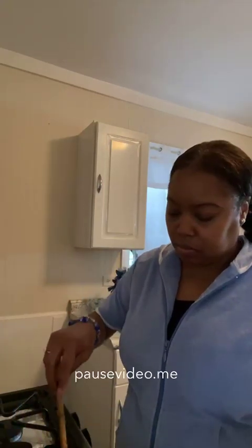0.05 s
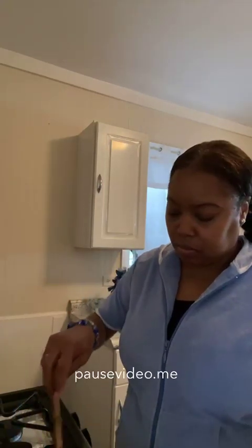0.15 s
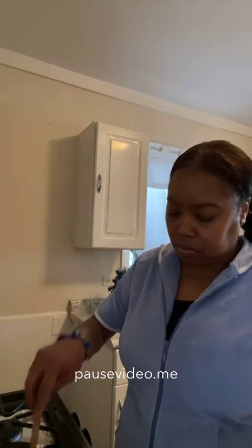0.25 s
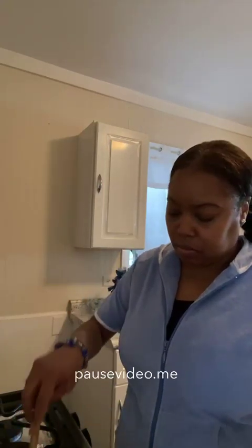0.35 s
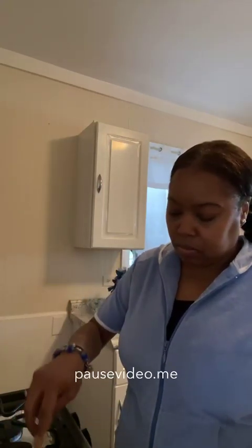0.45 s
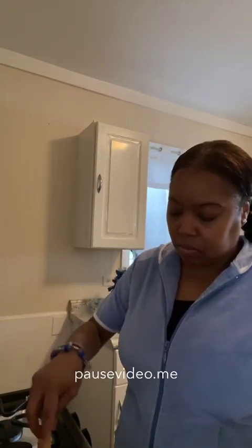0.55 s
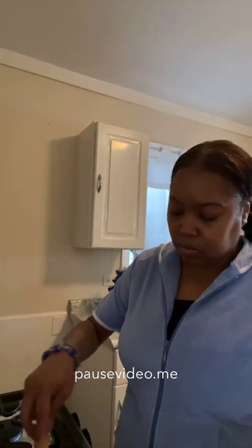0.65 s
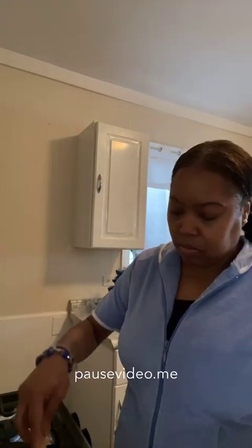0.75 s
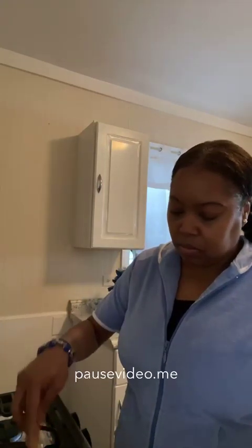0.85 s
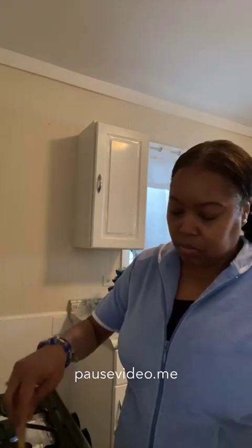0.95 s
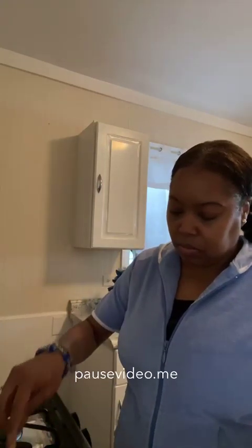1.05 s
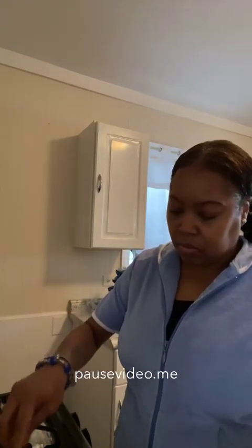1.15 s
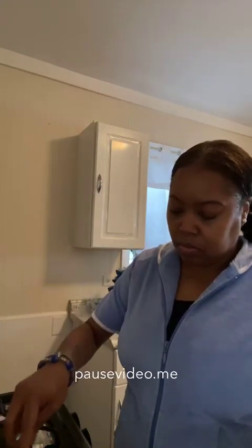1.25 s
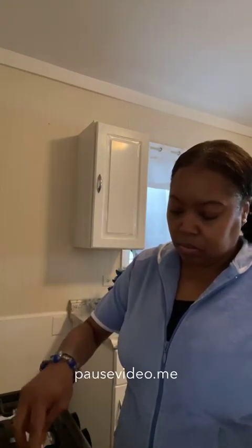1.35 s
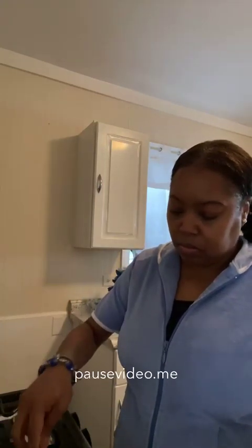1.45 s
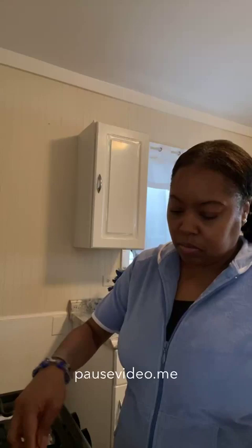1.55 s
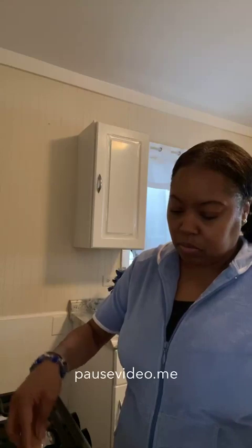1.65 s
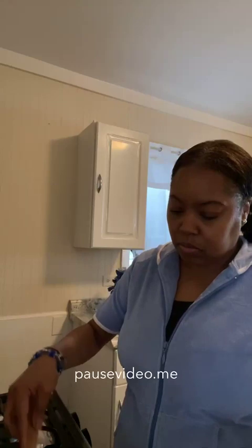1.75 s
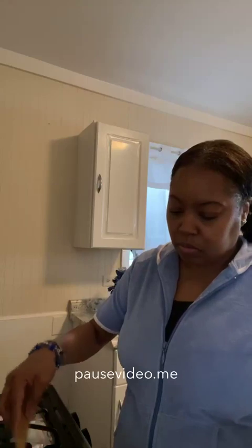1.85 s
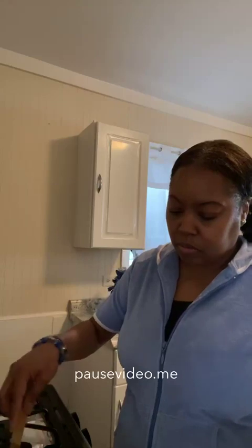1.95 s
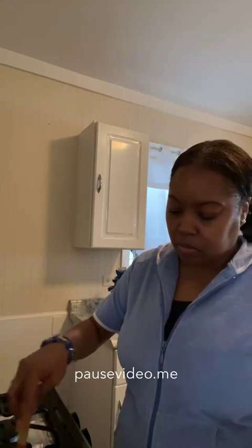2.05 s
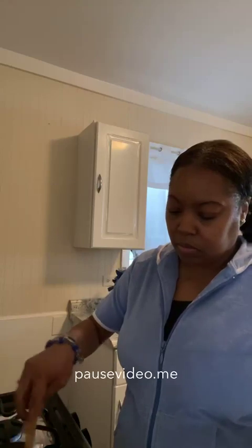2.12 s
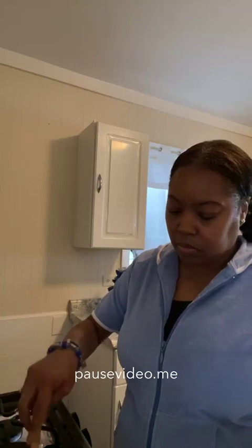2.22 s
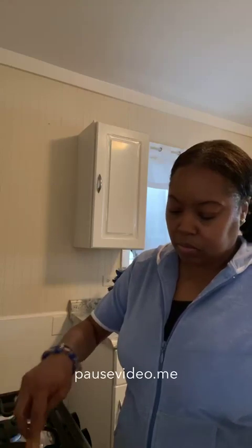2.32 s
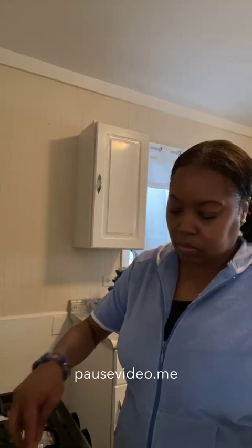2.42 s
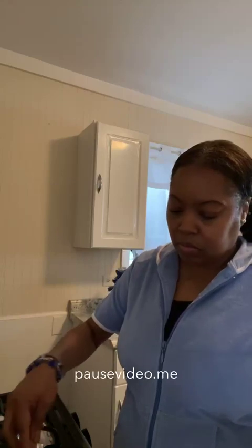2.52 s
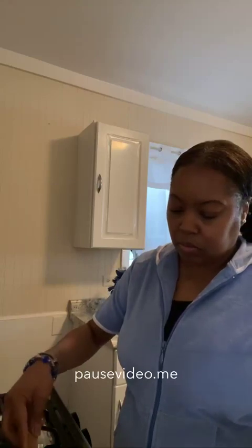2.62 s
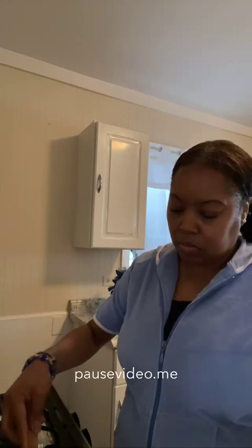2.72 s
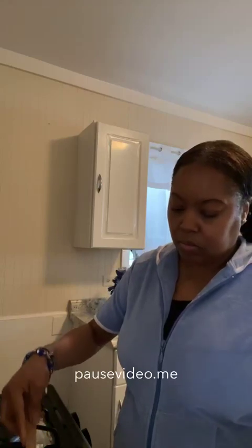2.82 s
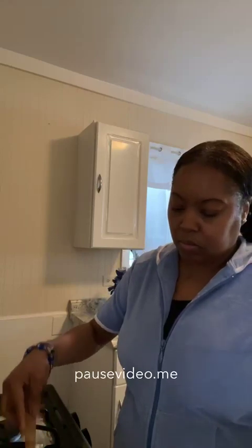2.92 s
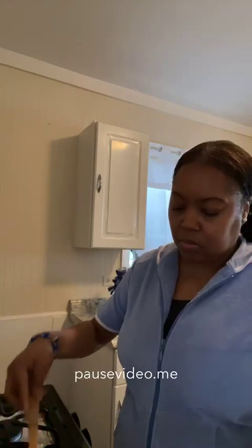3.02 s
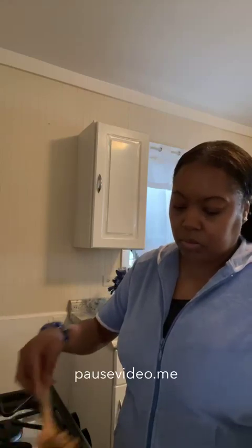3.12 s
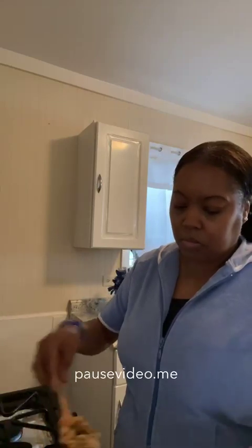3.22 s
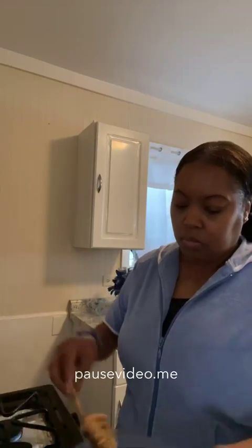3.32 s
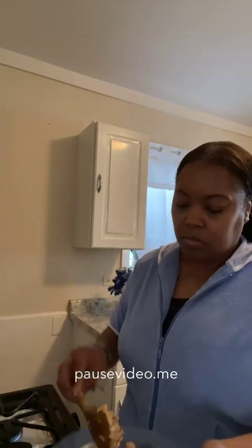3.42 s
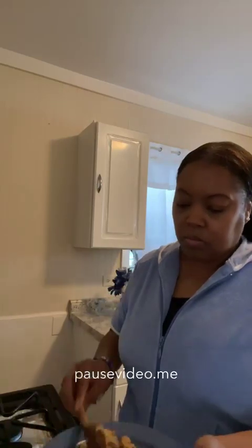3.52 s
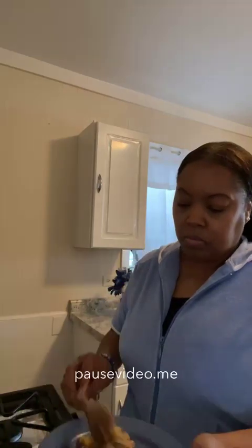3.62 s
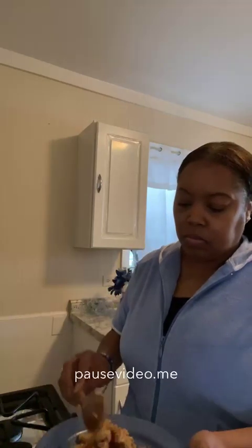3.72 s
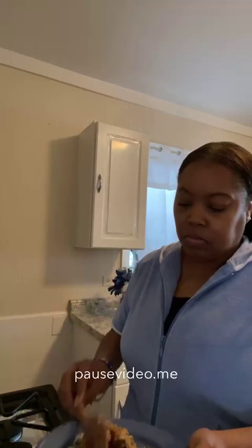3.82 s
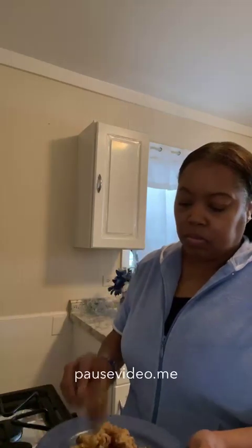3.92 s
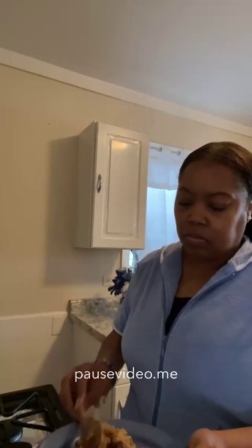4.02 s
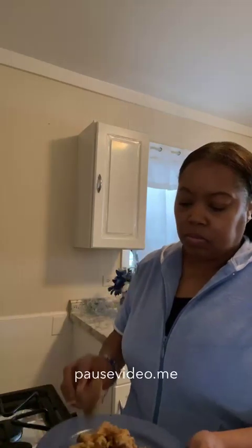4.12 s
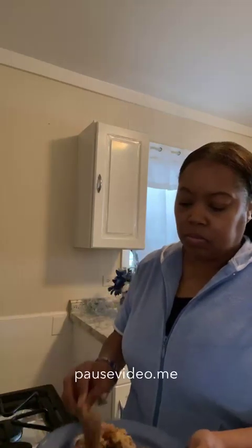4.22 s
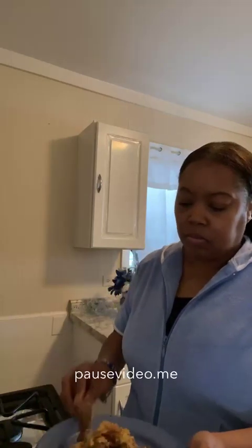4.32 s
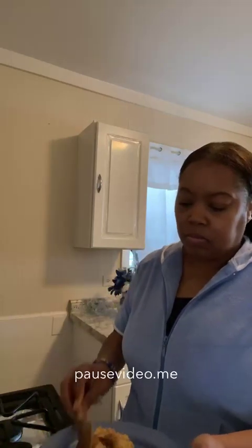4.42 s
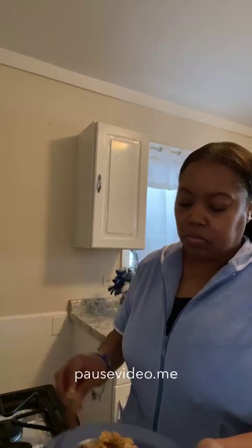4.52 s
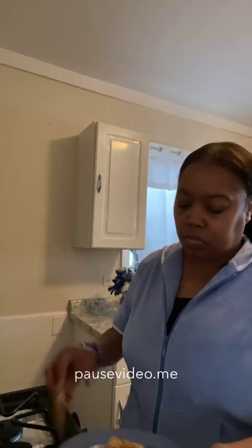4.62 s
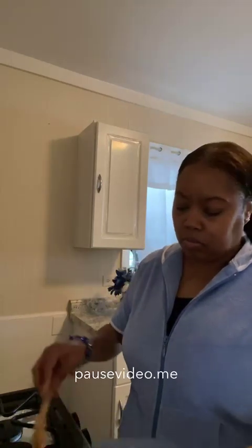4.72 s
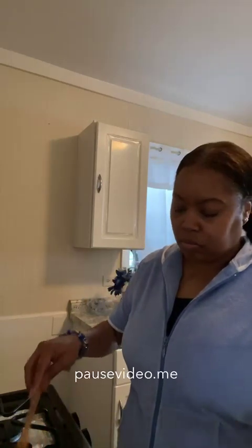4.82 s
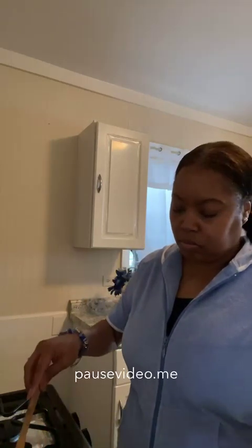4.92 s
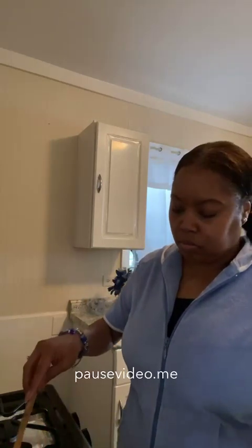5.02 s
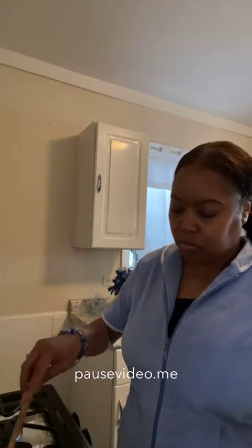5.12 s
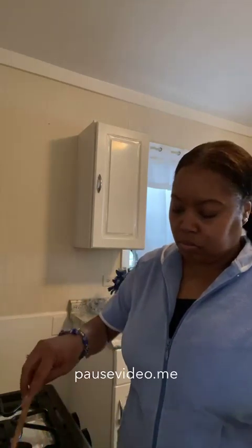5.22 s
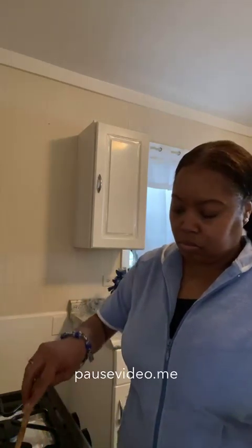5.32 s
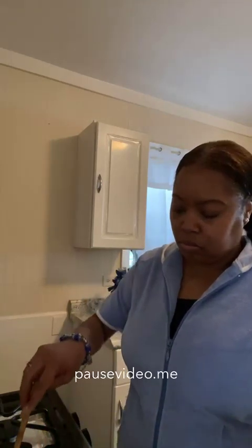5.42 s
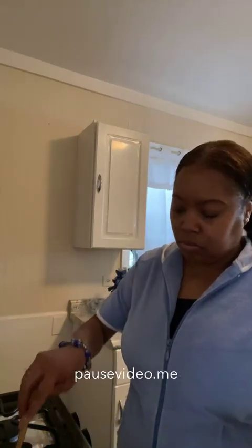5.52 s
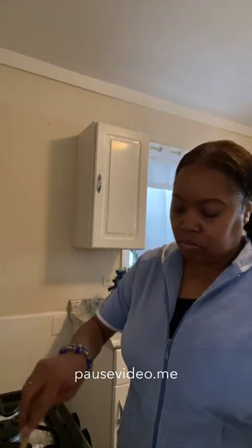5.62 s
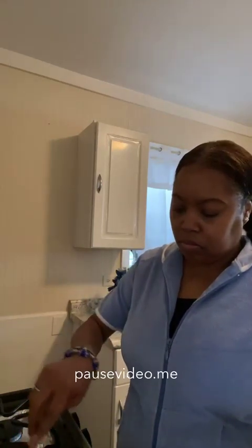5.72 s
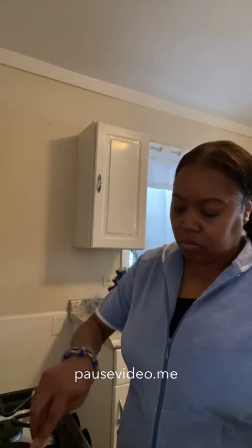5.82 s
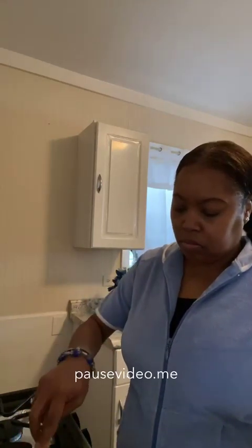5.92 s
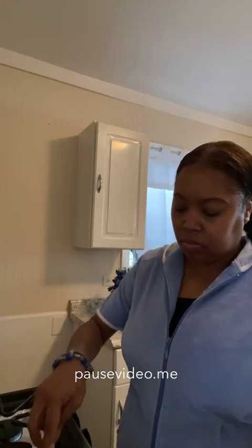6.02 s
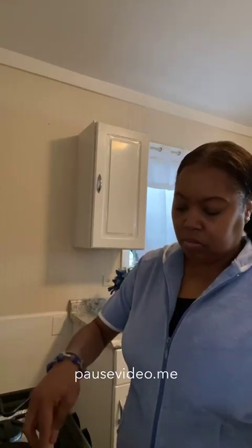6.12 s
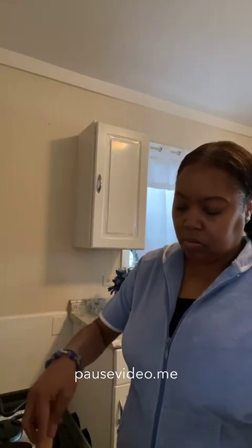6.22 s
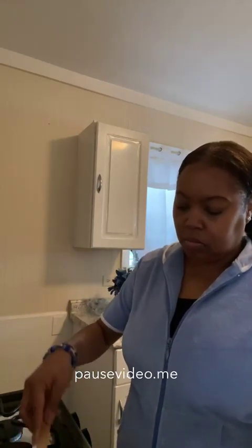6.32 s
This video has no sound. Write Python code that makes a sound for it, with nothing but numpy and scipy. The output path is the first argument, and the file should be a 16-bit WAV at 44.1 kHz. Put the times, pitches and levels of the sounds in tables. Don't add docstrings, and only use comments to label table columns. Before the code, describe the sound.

In a small, hard-walled kitchen a low fridge hum and airy room noise run throughout. A bead bracelet with a tiny metal charm rustles, clicks and tinkles faintly with wrist movements. Past the middle, a wooden spoon strikes a dish rim six times in under a second, two softer, three sharp and loud, one lighter, each with a short bright echo. Afterwards only sparse bracelet ticks remain. Close microphone.

```python
import sys
import numpy as np
from scipy import signal
from scipy.fft import rfft, irfft, next_fast_len
from scipy.io import wavfile
from scipy.ndimage import uniform_filter1d

SR = 44100
rng = np.random.default_rng(int(sys.argv[2]) if len(sys.argv) > 2 else 0)


def voltage_ratio(decibels):
    exponent = np.asarray(decibels, float) / 20
    return 10 ** exponent


def master(y):
    cut = np.clip(np.atleast_2d(y).T, -1, 1)
    pcm = np.round(cut * 32767)
    wavfile.write(sys.argv[1], SR, pcm.astype(np.int16))


N = 280476

# t/s, level/dB
WRIST = [(0, -82), (.32, -70.5), (.6, -73), (.75, -72.5), (.95, -82), (1.15, -79), (1.35, -71), (1.53, -67),
         (1.7, -75), (1.95, -81), (2.2, -70), (2.75, -79.5), (3.34, -72.5), (4.55, -71.5), (5.06, -74.5),
         (5.5, -85.5), (5.9, -68), (6.36, -77.5)]
# t/s, first partial/dB, second partial/dB, top partials/dB, time to skin damping/s
CHARM_STRIKES = [(0.117, -57.5, -73, -68, 0.041), (0.3175, -44, -63, -56, 0.25),
                 (0.3974, -46, -70, -67, 0.091), (0.653, -48, -75, -65, 0.034),
                 (0.7474, -42.5, -58.5, -52, 0.27), (0.798, -43, -66, -54, 0.015),
                 (0.837, -73, -66, -57.5, 0.21), (1.1104, -44, -59.5, -47, 0.062),
                 (1.2, -48, -59, -48.5, 0.23), (1.2408, -45.5, -52, -64, 0.091),
                 (1.4644, -42, -64, -55, 0.052), (1.535, -33.5, -61, -53, 0.027),
                 (1.7702, -39, -53, -44, 0.054), (2.1093, -50.5, -62, -62, 0.086),
                 (2.439, -57, -75, -63, 0.06), (2.694, -58, -72, -63.5, 0.24),
                 (4.098, -39.5, -58.5, -58.5, 0.17), (4.3026, -42, -68, -65.5, 0.093),
                 (4.4632, -38, -50, -48, 0.11), (5.0785, -34.5, -76, -51.5, 0.12),
                 (5.5348, -52.5, -52.5, -59.5, 0.15), (5.9984, -54, -55, -59.5, 0.11),
                 (6.0288, -49.5, -59, -63, 0.079), (6.1889, -55, -55, -54, 0.14)]
# t/s, peak/dB, hardness/(dB per octave), thud/dB
KNOCKS = [
    (3.484, -5, -5, -31),
    (3.647, -5.5, -6, -47),
    (3.798, 2, -0.85, -26),
    (3.98, 4, 0.5, -31),
    (4.153, 5, -0.15, -30.5),
    (4.326, -1, -2, -62),
]


def rms_one(x):
    return x / np.sqrt(np.mean(x ** 2) + 1e-20)


def at_hz(points, hz):
    table_hz, value = np.transpose(points)
    return np.interp(np.log(hz + 1), np.log(table_hz), value)


def colour(x, spectrum):
    size = next_fast_len(len(x) + 8192)
    hz = np.arange(size // 2 + 1) * SR / size
    cepstrum = irfft(np.log(voltage_ratio(at_hz(spectrum, hz))), size)
    cepstrum[1:size // 2] *= 2
    cepstrum[size // 2 + 1:] = 0
    return irfft(rfft(x, size) * np.exp(rfft(cepstrum)), size)[:len(x)]


def drift(rate_per_s):
    r = np.exp(-80 * np.pi * rate_per_s / SR)
    slow = signal.lfilter([1], [1, -2 * r, r * r], rng.standard_normal(N // 40 + 2002))[2000:]
    return np.interp(np.arange(N) / 40, np.arange(len(slow)), rms_one(slow))


def ring(force, hz, t60_s):
    r, w = voltage_ratio(-60 / (t60_s * SR)), 2 * np.pi * hz / SR
    return signal.lfilter([0, np.sin(w)], [1, -2 * r * np.cos(w), r * r], force + 1e-18)


def grains(level, spectrum, per_s, gain_db):
    present = rng.random(N) < per_s / SR
    size_db = 4.5 * np.minimum(rng.exponential(1, N), 5)
    clicks = present * voltage_ratio(size_db) * rng.choice([-1, 1], N)
    return voltage_ratio(gain_db) * level * rms_one(colour(clicks, spectrum))


def add(track, s, sound):
    i = round(s * SR)
    track[i:i + len(sound)] += sound[:N - i]


def fridge():
    # f/Hz, level/dB
    motor = [(59.5, -49), (58.6, -67), (257.8, -56)]
    # f/Hz, width/Hz, rms/dB
    booms = [(253.05, 7, -58.5), (59, 3.9, -60.5)]
    # f/Hz, rms/dB, level wobble/dB, wobble rate/(1/s)
    hum = [(127.5, -63, 2.5, 2.657), (154.5, -59.5, 2, 3.3), (231.3, -65.5, 6, 6.9), (367, -72.5, 3, 3.2),
           (463, -70, 3, 3.984), (641, -73.5, 5, 9.5), (750, -70.5, 3, 12.7), (1219, -74.5, 3, 27),
           (7200, -82.5, 3.5, 32.3)]
    t = np.arange(N) / SR
    out = np.zeros(N)
    for hz, db in motor:
        out += voltage_ratio(db) * np.sin(2 * np.pi * hz * t + 0.0967 * drift(2.28))
    for hz, width_hz, db in booms:
        t60_s = np.log(1000) / (np.pi * width_hz)
        out += voltage_ratio(db) * rms_one(ring(rng.standard_normal(N), hz, t60_s))
    for hz, db, wobble_db, rate_per_s in hum:
        level = np.sqrt(2) * voltage_ratio(db + wobble_db * drift(rate_per_s))
        phase_rad = 0.29 * wobble_db * drift(rate_per_s)
        out += level * np.sin(2 * np.pi * hz * t + phase_rad)
    return out


def room_noise():
    # f/Hz, level/(dB per Hz)
    air_colour = [(15, -20), (25, -15), (60, -3.5), (103, -14), (197, -12), (252, -7.5), (330, -11.5),
                  (746, -16.5), (1060, -22.5), (1220, -19.5), (2270, -30), (7510, -40), (11000, -54),
                  (15200, -44.5), (16500, -50.5)]
    # f/Hz, level/dB
    hiss_colour = [(9000, -25.5), (13000, -11), (15000, 1), (17000, -1.5)]
    air = voltage_ratio(-55.5 + 0.5 * drift(5.8)) * rms_one(colour(rng.standard_normal(N), air_colour))
    return air + voltage_ratio(-80.5) * rms_one(colour(rng.standard_normal(N), hiss_colour))


def all_ticks():
    # t/s, peak/dB, dull part/dB
    bead_hits = [(0.4194, -47, -63), (0.4544, -35, -55), (0.7112, -31.5, -68), (0.7456, -26, -62),
                 (0.9694, -47, -67), (1.0664, -43.5, -65), (1.096, -40, -56), (1.1214, -34.5, -53),
                 (1.1324, -27, -62), (1.3994, -43.5, -68), (1.451, -35, -64), (1.51, -33, -54),
                 (1.5204, -38, -44), (1.5594, -32, -59), (1.609, -40, -64), (2.2344, -45.5, -64.5),
                 (2.3624, -45, -71), (2.615, -40.5, -67), (2.7294, -45, -67), (2.9856, -41.5, -64),
                 (3.7214, -40.5, -67.5), (4.4174, -19.5, -73), (5.4331, -48, -68), (5.7768, -36.5, -60),
                 (5.881, -33.5, -55), (5.9214, -37.5, -43.5), (6.0676, -40.5, -63), (6.0891, -25, -67),
                 (6.1814, -33, -64), (6.2677, -41, -69)]
    follow = 0.7
    struck = [(s, -33.5 + follow * (top_db + 50.5), -62.5 + follow * (top_db + 47.5))
              for s, _, _, top_db, _ in CHARM_STRIKES]
    slot_s, stray_per_s = 0.02, 5
    slot = np.arange(0, N / SR - 0.03, slot_s)
    chance = rng.random((round(N / SR / slot_s), 3))[:len(slot)]
    late, loud, draw = chance.T
    effort_db = np.interp(slot, *np.transpose(WRIST)) + 75
    stray = np.transpose([slot + 0.025 * late, -57 + 10 * loud, np.full(len(slot), -73.5)])
    happens = draw < slot_s * stray_per_s * voltage_ratio(0.5 * effort_db)
    return np.concatenate([bead_hits, struck, stray[happens]])


def rustle(ticks):
    # f/Hz, level/dB
    sleeve_colour = [(1500, -31), (3000, -2.5), (5000, 0), (7000, -4), (9000, -4), (12000, -19)]
    # f/Hz, level/dB
    slide_colour = [(4000, -24), (7000, -9), (9500, -2.5), (12000, -8.5), (14000, -1.5), (15500, 1),
                    (17000, -5)]
    t, shaking = np.arange(N) / SR, np.zeros(N)
    half_s = t[:SR // 2]
    on_charm = np.isin(ticks[:, 0], np.transpose(CHARM_STRIKES)[0])
    for (s, tick_db, _), charm_hit in zip(ticks, on_charm):
        add(shaking, s, voltage_ratio(-6.5 * charm_hit + 0.8 * (tick_db + 36) - 60 * half_s / 0.13))
    for s, peak_db, *_ in KNOCKS:
        add(shaking, s, voltage_ratio(peak_db + 4 - 60 * half_s / 0.22))
    moving = voltage_ratio(np.interp(t, *np.transpose(WRIST)))
    sleeve = grains(moving + voltage_ratio(-68) * shaking, sleeve_colour, per_s=3000, gain_db=-4.5)
    slide = grains(voltage_ratio(-14) * moving + voltage_ratio(-65) * shaking, slide_colour, per_s=2495, gain_db=5)
    return sleeve + slide


def charm():
    # f/Hz, cluster width/Hz, cluster share, t60/s, gain/dB
    partials = [(7611, 40, 0.0601, 0.5, -4), (10170, 150, 0.45, 0.25, -1), (13700, 350, 1.2, .12, -1),
                (15170, 490, .6, .15, -1)]
    # t/s, first/dB, second/dB, top partials/dB, time to damping/s
    grazes = [
        (1.1368, -51, -59, -47, 0.065),
        (1.6115, -65, -79, -58, 0.11),
        (4.5033, -37, -50, -62, 0.065),
        (4.8224, -60, -73, -84, 0.09),
        (5.5996, -55.5, -61, -61, 0.14),
        (5.7153, -64, -82, -68, 0.12),
        (5.7764, -64, -62, -64, 0.11),
        (6.129, -59, -75, -74, 0.11),
    ]
    out, t = np.zeros(N), np.arange(SR // 3) / SR
    onset = 1 - np.exp(-t / 0.00053)
    touches = [*CHARM_STRIKES, *grazes]
    chances = rng.uniform(-1, 1, (40, 4, 6))
    for (s, first_db, second_db, top_db, damped_s), chance in zip(touches, chances):
        damping_db = -14 * (t / damped_s) ** 4
        levels_db = (first_db, second_db, top_db, top_db)
        for (hz, width_hz, share, t60_s, gain_db), db, detune in zip(partials, levels_db, chance):
            decay_db = -60 * t / t60_s
            cluster_hz = hz + width_hz * detune[1:, None]
            cluster = np.sin(2 * np.pi * cluster_hz * t).sum(axis=0) * voltage_ratio(decay_db)
            partial = np.sin(2 * np.pi * (hz + 4 * detune[0]) * t) + share * cluster
            add(out, s, voltage_ratio(db + gain_db + decay_db + damping_db) * onset * partial)
    return out


def bead_ticks(ticks):
    # f/Hz, level/dB
    bright_colour = [(1500, -30.5), (4000, -11.5), (7500, 0), (11000, -14), (14000, -12), (17000, -5.5)]
    # f/Hz, level/dB
    dull_colour = [(800, -26), (2000, -10), (3500, -2), (5500, -2), (9000, -30.5)]
    bright, dull, t = np.zeros(N), np.zeros(N), np.arange(300) / SR
    noises = rng.choice([-1, 1], (400, len(t)))
    for (s, tick_db, dull_db), noise in zip(ticks, noises):
        add(bright, s, voltage_ratio(tick_db - 4) * noise * np.exp(-t / 0.002))
        add(dull, s, voltage_ratio(dull_db + 15) * noise * np.exp(-t / 0.0006))
    return colour(bright, bright_colour) + colour(dull, dull_colour)


def knocks():
    # f/Hz, level/dB, t60/s
    modes = [(740.2, -23, 0.053), (1213, -6.5, .05), (1501, -8, 0.02), (1789, -1, 0.03), (2007, -5, 0.0043),
             (2240, -14.5, 0.01), (2518, 0.5, 0.013), (2845, -6.5, 0.016), (3204, -1, 0.013),
             (3680, -11.5, 0.0101), (3760, -24, 0.019), (4290, -3.5, 0.059), (4620, -14, 0.014),
             (5260, -8.5, 0.02), (5868, -20.5, 0.13), (5550, -10, 0.027), (7310, -14.5, 0.06),
             (8360, -24, 0.13), (8940, -40.5, 0.0099), (10410, -33, 0.0054), (14380, -29, 0.014)]
    # f/Hz, level/dB
    crack_colour = [(150, -26.5), (900, -22.5), (1050, -13.5), (1200, -8.5), (1750, -2), (2200, -0.5),
                    (3040, -10), (4250, -6), (5900, -9), (6550, -19.5), (9500, -25), (10200, -40.5),
                    (15000, -41), (16500, -51)]
    out, t = np.zeros(N), np.arange(SR // 3) / SR
    click = 1.0 * (t == 0)
    resting = 0.47 + 0.47 / (1 + (t / 0.0051) ** 8)
    crack = 0.2 / (1 + (t / 0.0058) ** 8)
    rattle = 0.067 * voltage_ratio(-60 * t / 0.27)
    onset = 1 - np.exp(-t / 0.00044)
    for s, peak_db, hardness, thud_db in KNOCKS:
        body = np.zeros(len(t))
        for k, (hz, db, t60_s) in enumerate(modes):
            mode_db = db + hardness * np.log2(hz / 2000) + 0.8 * rng.normal()
            body += (-1) ** k * voltage_ratio(mode_db) * ring(click, hz, t60_s)
        body = body * resting / np.max(np.abs(body))
        edge = [(hz, db + hardness * np.log2(hz / 2000)) for hz, db in crack_colour]
        noise = rms_one(colour(rng.standard_normal(len(t)), edge))
        thud = voltage_ratio(thud_db + 1.5) * np.sin(2 * np.pi * 330 * t) * np.exp(-t / 0.00304)
        add(out, s, voltage_ratio(peak_db) * (body + (crack + rattle) * noise) * onset + thud)
    out = signal.sosfilt(signal.butter(2, 220, "high", fs=SR, output="sos"), out)
    return signal.lfilter(*signal.iirnotch(6650, 7, fs=SR), out)


def kitchen(x):
    # f/Hz, t60/s
    decay = [(200, 0.22), (530, 0.45), (1390, 0.35), (3680, 0.31), (9700, 0.3), (16000, 0.32)]
    t = np.arange(SR // 2) / SR
    edges_hz = 100 * 2 ** np.arange(0, 7.6, 0.5)
    white = rng.standard_normal((2, len(t)))
    tail = np.zeros(len(t))
    for k, (low, high) in enumerate(zip(edges_hz, edges_hz[1:])):
        band = signal.butter(2, [low, high], "band", fs=SR, output="sos")
        t60_s = at_hz(decay, np.sqrt(low * high))
        tail += signal.sosfilt(band, white[k % 2]) * voltage_ratio(-60 * t / t60_s)
    tail *= np.clip((t - 0.002) / 0.00077, 0, 1)
    tail *= 1 + 0.14 * np.exp(-t / 0.013)
    return signal.fftconvolve(x, tail / np.sqrt(np.sum(tail ** 2)))[:N]


def scene():
    spoon, bell, ticks = knocks(), charm(), all_ticks()
    beads = bead_ticks(ticks) + rustle(ticks)
    wet = voltage_ratio(-6.5) * spoon + voltage_ratio(-4) * beads + voltage_ratio(-10.5) * bell
    return (spoon + beads + bell + fridge() + kitchen(wet) + room_noise())[None]


def gain_control(x):
    threshold_db, share, release_db_per_s = -26.5, 0.1, 60
    climb_db = release_db_per_s * np.arange(N) / SR
    power_db = 10 * np.log10(uniform_filter1d(x ** 2, 256, axis=1) + 1e-12)
    over_db = np.maximum(power_db - threshold_db, 0)
    held_db = np.maximum.accumulate(over_db + climb_db, axis=1) - climb_db
    return x * voltage_ratio(-share * signal.lfilter([0.003], [1, -0.997], held_db))


def round_peaks(x):
    excess = x - 0.87 * np.tanh(x / 0.87)
    return x - signal.sosfilt(signal.butter(2, 160, "high", fs=SR, output="sos"), excess)


def gate_top(x):
    top = signal.sosfiltfilt(signal.ellip(8, 0.2, 45, 15900, "high", fs=SR, output="sos"), x)
    power = uniform_filter1d(top ** 2, 128, axis=1)
    attack = (power > 7 * uniform_filter1d(power, 2048, axis=1)) & (power > voltage_ratio(-124))
    x = x - top * (1 - uniform_filter1d(1.0 * attack, 128, axis=1))
    return signal.sosfilt(signal.ellip(10, 0.2, 80, 16750, fs=SR, output="sos"), x)


def band_limit(x):
    return signal.sosfilt(signal.butter(12, 16970, fs=SR, output="sos"), x)


def record(dry):
    mix = gate_top(round_peaks(gain_control(dry)))
    return band_limit(mix)


dry = scene()
out = record(dry)
master(out)
```